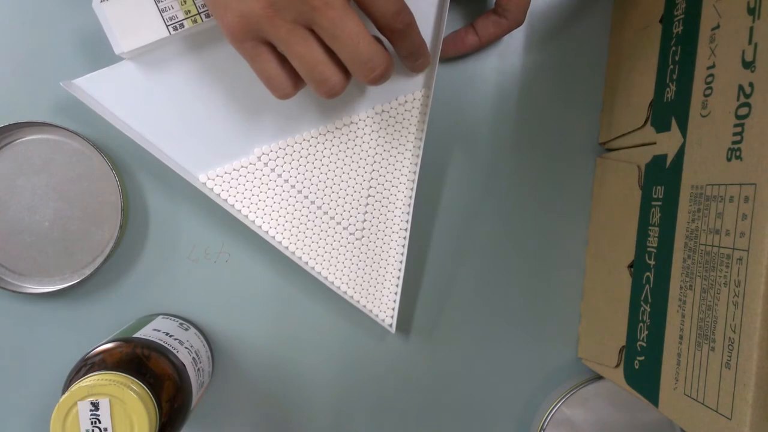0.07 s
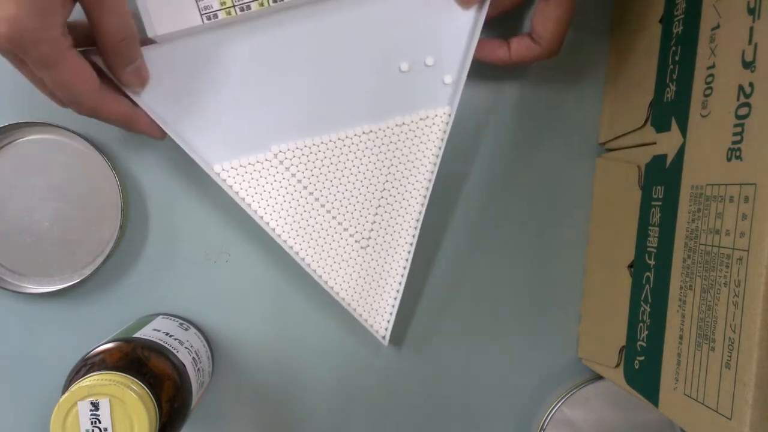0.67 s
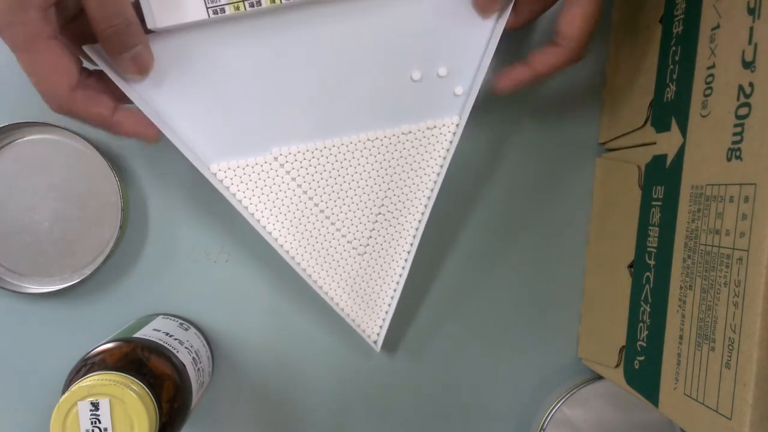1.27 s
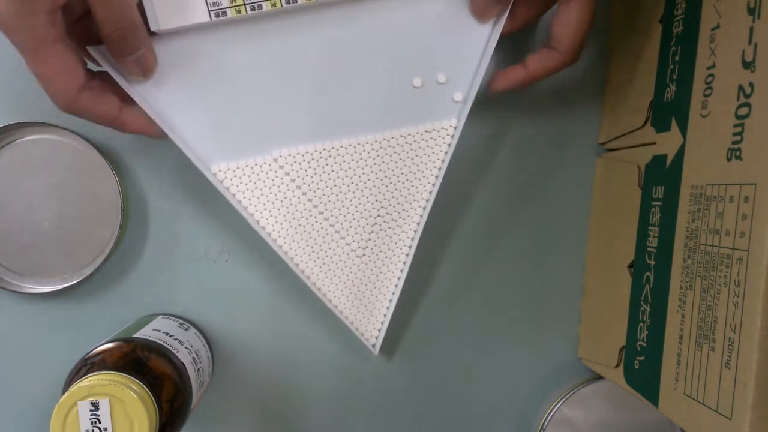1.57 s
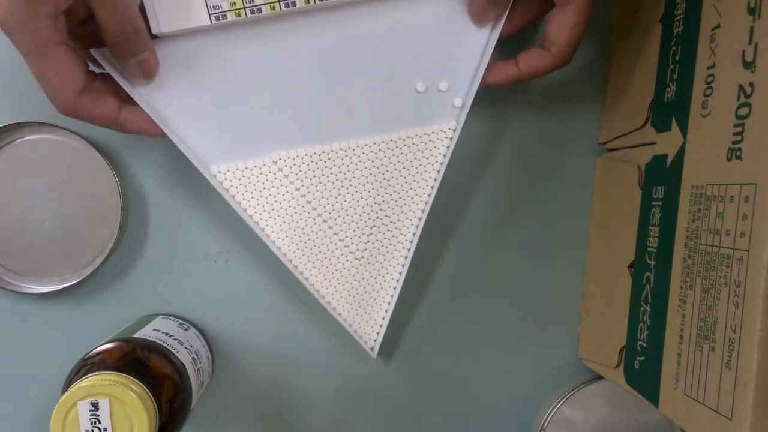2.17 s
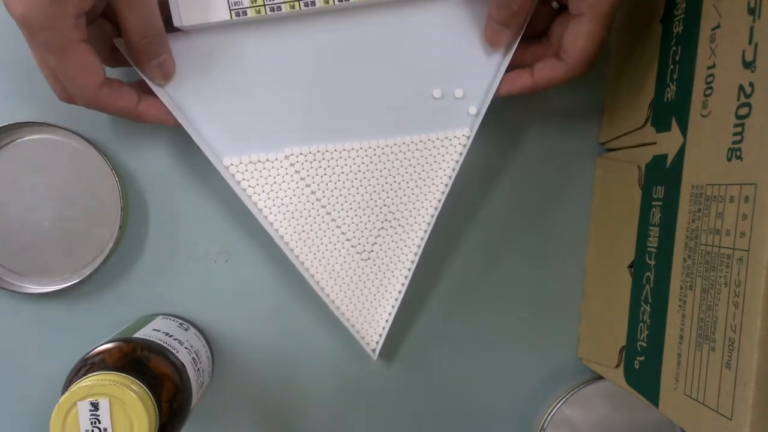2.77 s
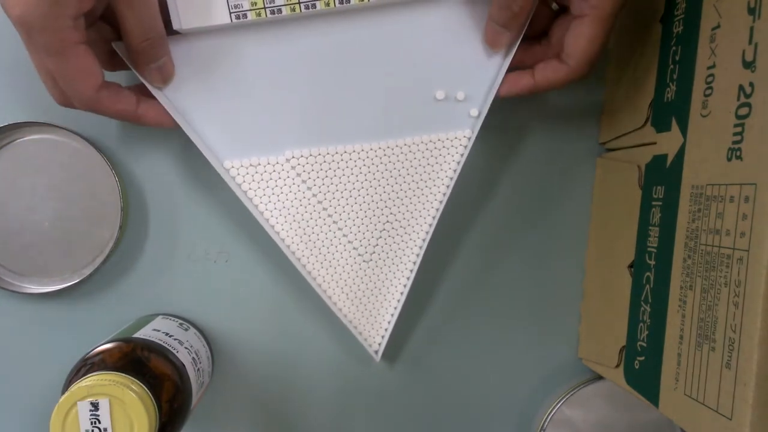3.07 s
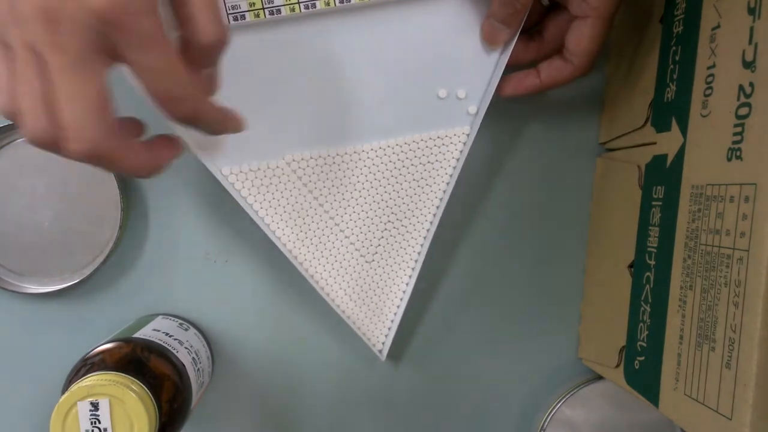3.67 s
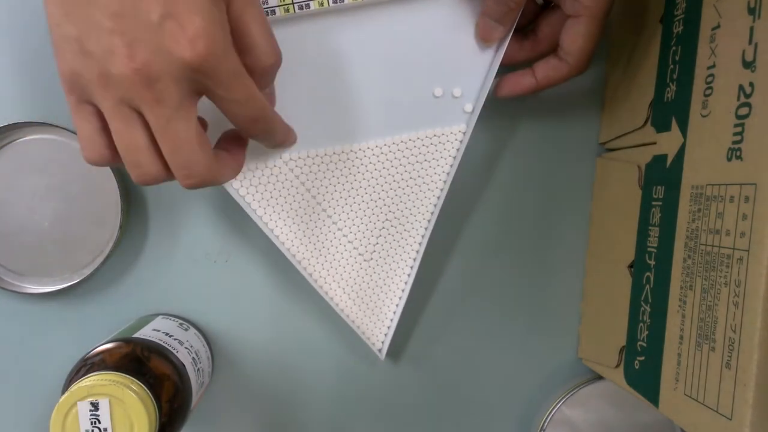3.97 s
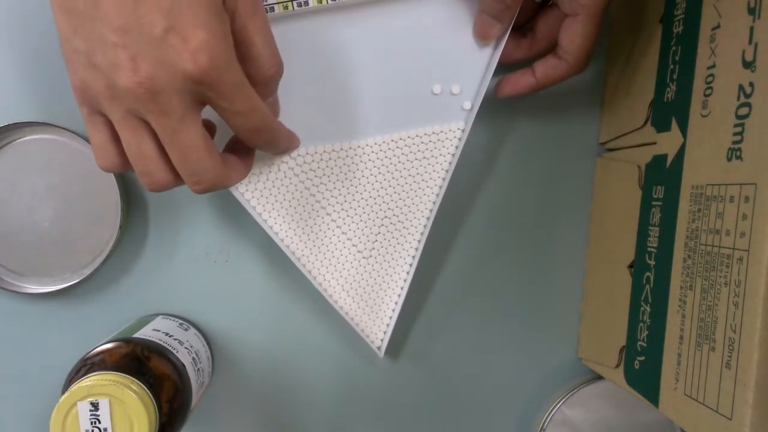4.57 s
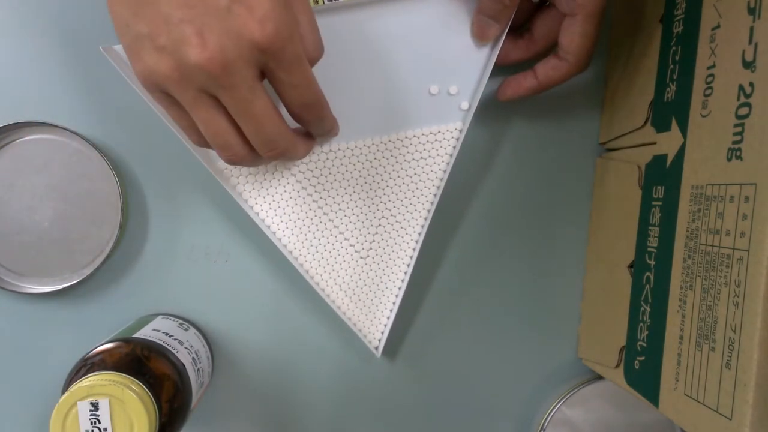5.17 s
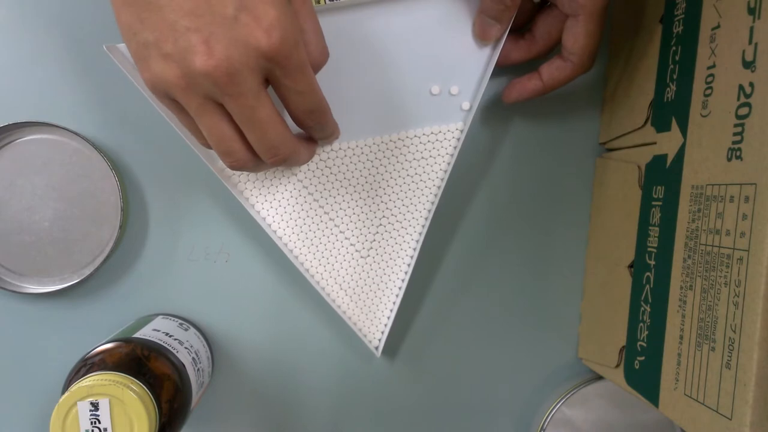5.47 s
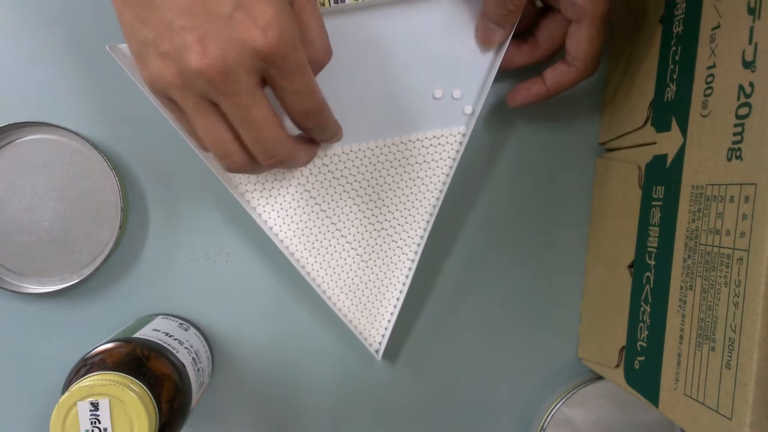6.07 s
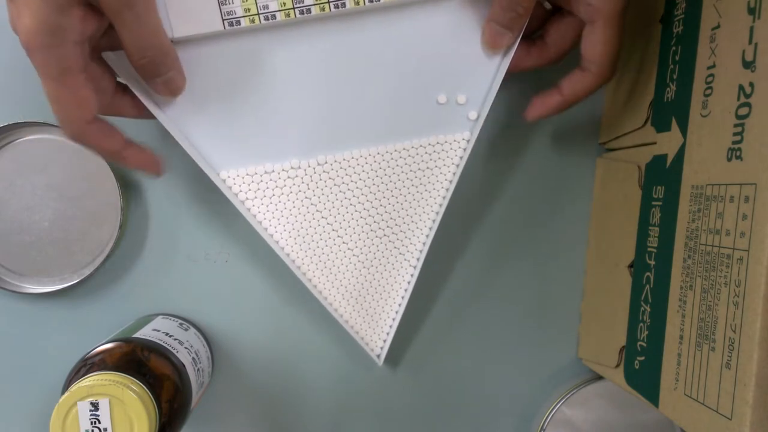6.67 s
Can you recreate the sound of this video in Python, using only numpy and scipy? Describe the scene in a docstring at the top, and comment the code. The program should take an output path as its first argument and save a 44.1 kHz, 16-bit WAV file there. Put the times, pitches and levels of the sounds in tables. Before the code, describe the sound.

In a small room with a low ventilation hum, fingers brush faintly on a plastic tray of small tablets. A series of light taps on the rim sets the tablets clicking and rattling, loudest when the tray is jogged midway. The tablets then slide and rustle in short bursts under a finger, before a final tap and clatter. The right microphone picks up less of the high treble.

```python
"""Ventilation hums in a small room, and fingers brush faintly on a plastic counting tray held over a table.
Small tablets lie heaped in a corner of the triangular tray. A fingernail taps the rim: the tablets hop
and land in a short clatter, each impact exciting the modes of the thin sheet. The tray is jogged and a
finger levels the heap, so tablets slide and rustle. The right microphone hears a dull side."""
import sys
import numpy as np
from scipy import signal
from scipy.fft import rfft, irfft, next_fast_len
from scipy.io import wavfile

SR = 44100
rng = np.random.default_rng(int(sys.argv[2]) if len(sys.argv) > 2 else 0)


def unload_wav(signal):
    """Save mono or channel-first audio to the path in sys.argv[1] as 16-bit WAV at rate SR, clipped to [-1, 1]."""
    wavfile.write(
        sys.argv[1],
        SR,
        np.round(np.clip(np.atleast_2d(signal).T, -1, 1) * 32767).astype(np.int16),
    )


N = 305172

# knocks on the rim: t/s, relative click level/dB, landing level/dB, flight time/s, landing spread/s
RIM_TAPS = [(0.9762, -47, -37, .0176, .0036), (1.1336, -49, -44, .018, 0.0044),
            (1.303, -40, -38.5, .0172, 0.0057), (1.368, -46, -32, 0.011, 0.0035),
            (1.456, -37, -35.5, .018, .0055), (1.6297, -36.5, -33, 0.015, 0.0051),
            (1.7921, -44, -34, 0.016, 0.0074), (1.969, -41, -34.5, .016, 0.0063),
            (2.1844, -42.5, -34, .0152, 0.0047), (2.796, -41, -29.5, .0165, 0.0081),
            (3.141, -31, -26, .011, .0035), (5.092, -48, -55.5, 0.0065, .005),
            (6.787, -38.5, -34.5, 0.019, 0.0073)]
# spectrum of a tablet striking the tray: f/Hz, level/dB
IMPACT_SPECTRUM = [(200, -24.5), (750, -13), (1050, -3), (1400, -2), (2000, 0.5), (2700, 3.5), (4300, -0.5),
                   (5100, 0), (6000, -3.5), (7500, -3), (8800, 2), (10400, -7)]


def amp(db):
    """Amplitude ratio of a level in decibels."""
    return 10 ** (np.asarray(db) / 20)


def unit(x):
    """Normalisation to an rms of 1."""
    return x / np.sqrt(np.mean(x ** 2) + 1e-20)


def along(points, hz):
    """Interpolation of (f/Hz, value) points on a logarithmic frequency axis."""
    f, values = np.transpose(points)
    return np.interp(np.log(hz + 1), np.log(f + 1), values)


def filtered(x, response):
    """Linear filtering: the spectrum of x is multiplied by a frequency response."""
    n = x.shape[-1]
    size = next_fast_len(n + 4096)
    return irfft(rfft(x, size) * response(np.fft.rfftfreq(size, 1 / SR)), size)[..., :n]


def coloured(x, points):
    """Spectral shaping by (f/Hz, level/dB) points."""
    return filtered(x, lambda hz: amp(along(points, hz)))


def tilted(points, db_per_octave):
    """Spectral tilt about 4 kHz, levelling off below 1 kHz."""
    return [(hz, db + db_per_octave * np.log2(max(hz, 1000) / 4000)) for hz, db in points]


def resonant(x, centre_hz, width_hz, db):
    """A single damped resonance in parallel with the direct path."""
    return filtered(x, lambda hz: 1 + amp(db) / (1 + 2j * (hz - centre_hz) / width_hz))


def wobble(rate):
    """Band-limited random fluctuation with rate independent values a second."""
    count = int(N * rate / SR) + 4
    fine = signal.resample(rng.standard_normal(count), count * 20)
    return np.interp(np.arange(N) * rate / SR * 20, np.arange(len(fine)), fine)


def swell(t, rise, t60):
    """Gaussian growth up to t = 0, then exponential decay."""
    return np.where(t < 0, np.exp(-.5 * (t / rise) ** 2), amp(-60 * np.abs(t) / t60))


def add(track, start_s, sound):
    """Superposition of a sound on the track from start_s on."""
    start = round(start_s * SR)
    part = sound[:, max(-start, 0):N - start]
    track[:, max(start, 0):][:, :part.shape[1]] += part


def contact(spectrum, t60, ring_db, count=1, direct=0.81, lag_s=.00045):
    """Stereo impulse responses of count spots on the tray: each cracks and weights the modes its own way."""
    # modes of the thin plastic sheet: f/Hz, level/dB, t60/s
    sheet_modes = [(1354, -11, 0.23), (1607, 1.5, 0.086), (1854, -1, 0.022), (2560, 0, 0.034),
                   (2680, 9, 0.015), (3350, -10, 0.12), (3490, -6, 0.073), (3940, 3.5, 0.056),
                   (4563, 4.5, 0.069), (5120, -1, 0.058), (6260, -3, 0.031), (7730, 10.5, 0.016),
                   (8250, -26, 0.026), (10000, 3, 0.025)]
    t = np.arange(SR // 15) / SR
    hz, db, mode_t60 = np.transpose(sheet_modes)
    modes = amp(db[:, None] - 60 * t / mode_t60[:, None]) * np.sin(2 * np.pi * hz[:, None] * t)
    ring = rng.standard_normal((count, 2, len(hz))) @ modes
    scattered = rng.standard_normal((count, 2, len(t))) * amp(-60 * t / t60)
    crack = rng.standard_normal((count, len(t))) * amp(-120 * t / t60)
    crack = np.stack([np.roll(crack, round(lag_s * SR), axis=1), crack], axis=1)  # reaches the right first
    sound = scattered + direct * crack + amp(ring_db) * ring
    sound = coloured(np.pad(sound, [(0, 0), (0, 0), (SR // 2000, 0)]), spectrum)
    return sound / np.sqrt(np.sum(sound ** 2, axis=(1, 2), keepdims=True) / 2)


def patter(envelope, spots, rate, scatter_db):
    """Shot noise: rate random blows a second share the envelope's energy, each ringing its own spot."""
    shape = (len(spots), len(envelope))
    hit = rng.random(shape) < rate / SR / len(spots)
    blows = np.zeros(shape)
    blows[hit] = amp(scatter_db * rng.standard_normal(hit.sum()))
    blows *= envelope
    blows *= np.linalg.norm(envelope) / (np.linalg.norm(blows) + 1e-12)
    size = next_fast_len(len(envelope) + spots.shape[-1])
    return irfft(np.sum(rfft(blows, size)[:, None] * rfft(spots, size), axis=0), size)


def background(floor_db=-60, drift_db=1.37):
    """A partly coherent noise floor under the ventilation's randomly modulated motor hum and fan whine."""
    # room air with faint microphone hiss: f/Hz, relative level/dB
    floor_spectrum = [(20, -17.5), (45, -27), (64, -15), (85, -15.5), (135, -5), (170, -11), (280, -13.5),
                      (440, -11.5), (700, -16), (1250, -15.5), (2200, -19.5), (4300, -21), (6500, -30),
                      (10800, -36.5)]
    # likeness of left and right: f/Hz, correlation
    floor_correlation = [(30, 0.4), (100, 0.78), (280, -0.85), (550, -0.45), (1150, -0.061), (10000, 0.083)]
    # balance of the noise floor: f/Hz, left minus right level/dB
    floor_balance = [(80, 10), (200, 2.5), (1100, 2.5), (1900, 2), (3400, -4), (5900, -0.5), (10000, 9)]
    # motor and fan tones: f/Hz, left level/dB, right level/dB, phase between sides/rad, waver/Hz, throb/dB
    tones = [(94.7, -64.5, -62.5, 2.17, 2.56, 2.5), (120.5, -62, -64, 2.32, 2.98, 2),
             (1132.5, -72, -81.5, 0.45, 0.95, 1)]

    def mid_side_response(hz):
        """The ratio of side to mid sets the correlation between the channels."""
        angle = np.arccos(np.clip(along(floor_correlation, hz), -.95, 1)) / 2
        return amp(along(floor_spectrum, hz)) * np.array([np.ones_like(hz), np.tan(angle)])

    mid, side = filtered(rng.standard_normal((2, N)), mid_side_response)
    floor = np.array([mid + side, mid - side])
    floor = filtered(floor, lambda hz: amp(np.outer([.5, -.5], along(floor_balance, hz))))
    out = amp(floor_db + drift_db * wobble(3.17)) * unit(floor)
    for hz, left_db, right_db, offset, waver_hz, throb_db in tones:
        phase = 2 * np.pi * np.cumsum(hz + waver_hz * wobble(17)) / SR
        tone = amp(throb_db * wobble(12)) * np.sin([phase, phase + offset])
        out += amp([[left_db], [right_db]]) * unit(tone)
    return out


def room(x, delay_s=.008):
    """Reverberation: diffuse wall reflections decay exponentially, each frequency at its own rate."""
    # reverberation time: f/Hz, t60/s
    decay_times = [(200, 0.77), (1500, 0.23), (4000, 0.34), (10000, 0.32)]
    hz, t, noise = signal.stft(rng.standard_normal((2, SR // 2)), SR, nperseg=256)
    decay = amp(-60 * t / along(decay_times, hz)[:, None])
    tail = signal.istft(noise * decay, SR, nperseg=256)[1]
    tail = np.pad(tail / np.linalg.norm(tail[0]), [(0, 0), (round(delay_s * SR), 0)])
    return signal.fftconvolve(x, tail, axes=1)[:, :N]


def pushes(width_hz=90, firm_db=-44.5, rise_per_t60=0.034, lean_db=1.5):
    """Friction of skin drives the flexed sheet to a low scuff; a firm hand damps its hollow resonance."""
    # soft pushes of the hands: peak t/s, level/dB, t60/s, resonance f/Hz
    hand_pushes = [(.195, -62.5, .4, 334), (.625, -58, 0.3, 358), (1.079, -52, .17, 405),
                   (1.6, -62, 0.46, 335), (2.998, -45.5, 0.36, 600), (4.49, -58, .34, 490),
                   (4.83, -41.5, 0.38, 455)]
    # scuff of the loaded sheet: f/Hz, level/dB
    flex_spectrum = [(25, -46), (70, -12), (150, -7), (240, -14), (400, -0.5), (520, -1.5), (700, -0.5),
                     (950, -0.5), (1300, -7.5), (3000, -10), (8000, -70)]
    out, t = np.zeros((2, N)), np.arange(-SR // 10, SR // 3) / SR
    for peak_s, db, t60, grip_hz in hand_pushes:
        rub = coloured(rng.standard_normal((2, len(t))), flex_spectrum)
        hollow_db = 1.5 * (firm_db - db)
        scuff = unit(resonant(rub, grip_hz, width_hz, hollow_db))
        add(out, peak_s + t[0], amp(db) * swell(t, rise_per_t60 * t60, t60) * scuff)
    return amp([[lean_db], [-lean_db]]) * out


def brushes(t60_per_rise=15):
    """Stick-slip friction of skin and nail on plastic: a faint scratch with one pitch for each stroke; two rows
    give a soft, dark knock and the tablet landing after it."""
    # fingers brushing the rim and single tablets, plus a soft knock (5.0706 s) with its tablet landing (5.086
    # s) in a darker colour: peak t/s, level/dB, rise/s, scratch f/Hz
    strokes = [(.11, -57.5, 0.057, 2850), (.225, -53.5, 0.029, 3550), (.72, -58.5, .006, 2400),
               (.78, -58, .004, 4430), (1.72, -59, 0.04, 2270), (2.721, -61.5, 0.059, 4560),
               (5.0706, -44, .0012, 1800), (5.086, -46, 0.0037, 2480), (5.808, -64, 0.0042, 2110),
               (6.56, -61, 0.024, 4340)]
    # spectrum of one slip: f/Hz, level/dB
    slip_spectrum = [(200, -19), (700, -4), (1100, -1), (1700, -1), (2800, -2), (4200, -9), (6000, -3.5),
                     (10400, -4.5)]
    out, t = np.zeros((2, N)), np.arange(-SR // 5, SR // 3) / SR
    for peak_s, db, rise, scratch_hz in strokes:
        spots = contact(slip_spectrum, t60=0.0035, ring_db=-27.5, count=3)
        spots = resonant(spots, scratch_hz, width_hz=450, db=5)
        spots *= np.sqrt(2 * len(spots)) / np.linalg.norm(spots)  # unit mean energy per spot and side
        scratch = patter(swell(t, rise, t60_per_rise * rise), spots, rate=1800, scatter_db=0.5)
        add(out, peak_s + t[0], amp(db) * scratch)
    return out


def slides(settle_t60=0.4, creep_db=-27, creep_t60=1):
    """Granular flow: tablets nudge their neighbours as the heap gives way and settles; a few creep on."""
    # slips of the heap: peak t/s, level/dB, rise/s, tilt/(dB per octave)
    heap_slides = [(.12, -66, .06, 2), (.235, -57, 0.092, 12), (.92, -65.5, 0.086, 5),
                   (2.925, -53.5, 0.016, -3.5), (2.996, -34.5, 0.0083, 0), (3.093, -34, 0.016, 2.5),
                   (3.585, -62, .012, -3.5), (4.0, -48.5, .026, 0), (4.061, -39, 0.0054, 5.5),
                   (4.49, -48.5, .02, 2), (4.819, -30.5, .0061, 5), (4.9, -34, 0.017, 5.5),
                   (5.32, -51.5, 0.061, 1.5), (5.388, -41, 0.026, 1.5), (5.485, -49.5, 0.015, -1.5),
                   (6.2, -58, .055, 11), (6.247, -41.5, 0.0063, 3), (6.45, -62.5, .03, 3)]
    # spectrum of a sliding contact: f/Hz, level/dB
    rustle_spectrum = [(200, -46), (700, -6), (1400, -11), (2400, -6), (3800, -4.5), (4900, -5.5),
                       (5900, -6.5), (7500, -4.5), (9100, 4.5), (10400, -9.5)]
    out, t = np.zeros((2, N)), np.arange(-SR // 5, SR // 2) / SR
    for peak_s, db, rise, tilt in heap_slides:
        spots = contact(tilted(rustle_spectrum, tilt), t60=.004, ring_db=-42, count=6)
        envelope = np.hypot(swell(t, rise, settle_t60), amp(creep_db) * swell(t, rise, creep_t60))
        rustle = patter(envelope, spots, rate=5000, scatter_db=2.5)
        add(out, peak_s + t[0], amp(db) * rustle)
    return out


def taps(click_gain_db=22, buzz_gain_db=-6, buzz_t60=.09, lean_db=3.0):
    """Impulsive excitation: the nail clicks on the rim, louder on the left, and sets the heap buzzing."""
    # spectrum of a nail on plastic: f/Hz, level/dB
    nail_spectrum = [(200, -55), (900, -11), (2400, -15), (3200, 4), (3900, -18), (4700, -1), (5600, -6.5),
                     (6900, 3), (7600, -9), (9600, 11), (10100, 1), (10500, -12)]
    out, t = np.zeros((2, N)), np.arange(SR // 20) / SR
    balance = amp([[lean_db], [-lean_db]])
    for tap_s, db, *_ in RIM_TAPS:
        click = contact(nail_spectrum, t60=.014, ring_db=-36)[0]
        add(out, tap_s - .0005, amp(db + click_gain_db) * balance * click)
        spots = contact(IMPACT_SPECTRUM, t60=0.0048, ring_db=-46, count=3)
        envelope = amp(db + buzz_gain_db - 60 * t / buzz_t60)
        add(out, tap_s, patter(envelope, spots, rate=3000, scatter_db=3))
    return out


def landings(hard_db=-38, settle_db=-16, settle_t60=0.18, rebound_spread_s=0.0047, lean_db=1.3):
    """Impacts after free flight: tossed tablets land almost together, brighter if harder, then settle."""
    # the heap bounces and lands a second time: t/s, level/dB
    rebounds = [(1.390, -38.5), (1.8437, -35), (2.017, -49), (3.163, -26), (6.829, -38)]
    out, t = np.zeros((2, N)), np.arange(-SR // 30, SR // 8) / SR
    balance = amp([[lean_db], [-lean_db]])
    first = [(tap_s + flight, db, spread) for tap_s, _, db, flight, spread in RIM_TAPS]
    second = [(land_s, db, rebound_spread_s) for land_s, db in rebounds]
    for land_s, db, spread in first + second:
        shower = np.exp(-np.where(t < 0, np.abs(t / spread) ** 3 / 3, (t / spread / 2) ** 2))
        settling = amp(settle_db) * swell(t, spread / 2, settle_t60)
        spectrum = tilted(IMPACT_SPECTRUM, db_per_octave=.3 * max(db - hard_db, 0))
        spots = contact(spectrum, t60=0.0065, ring_db=-32, count=7)
        clatter = patter(np.hypot(shower, settling), spots, rate=3600, scatter_db=2.0)
        add(out, land_s + t[0] - .0015, amp(db) * balance * clatter)
    return out


def scene():
    """Superposition of the tray and its reverberation, shadowed on the right, over the background."""
    # acoustic shadow on the dull side: f/Hz, right minus left level/dB
    shadow = [(200, 8.5), (700, -2), (1500, 3.5), (2600, 1), (4000, 8), (5000, 4), (6000, -3), (7200, -10),
              (9000, -23.5), (10400, -18.5)]
    tray = taps() + landings() + slides() + brushes() + pushes()
    left, right = tray + amp(-14) * room(tray)
    return np.array([left, coloured(right, shadow)]) + background()


def record(dry, cutoff_hz=10600):
    """Band limiting: a very steep low-pass removes the treble above the cutoff."""
    return filtered(dry, lambda hz: 1 / np.sqrt(1 + (hz / cutoff_hz) ** 320))


dry = scene()
out = record(dry)
unload_wav(out)
```